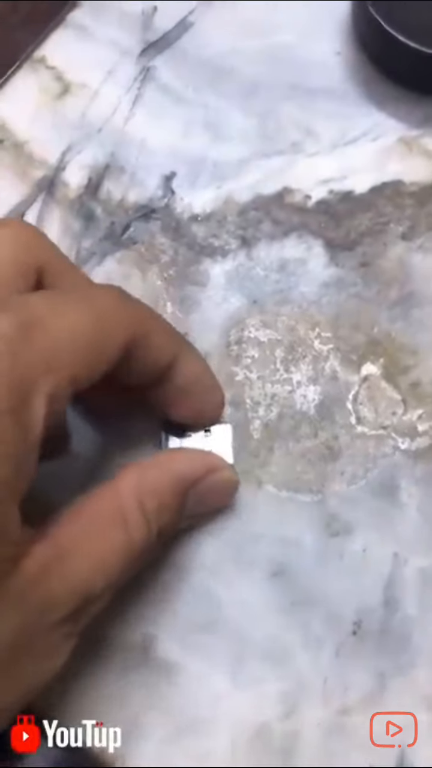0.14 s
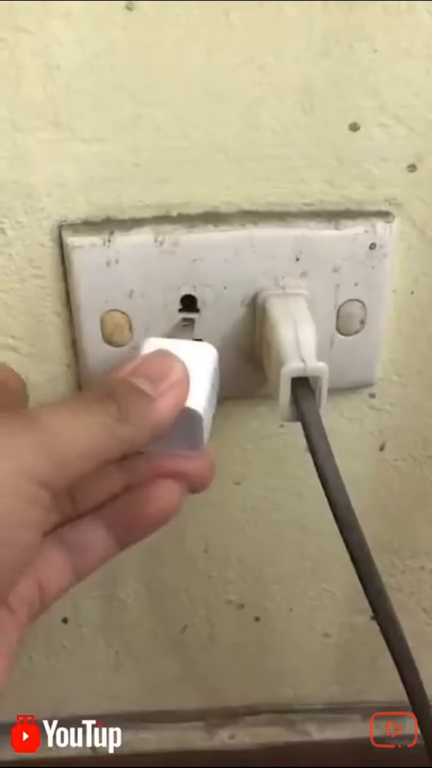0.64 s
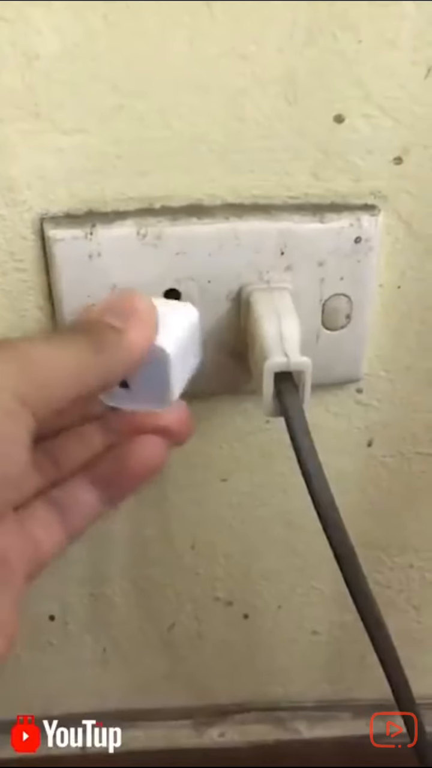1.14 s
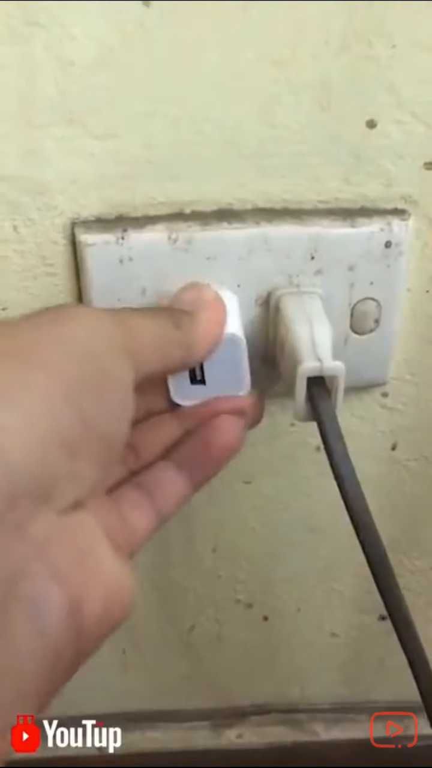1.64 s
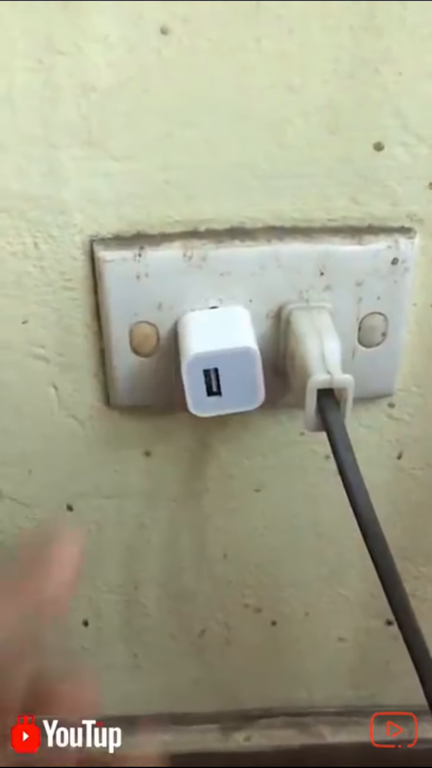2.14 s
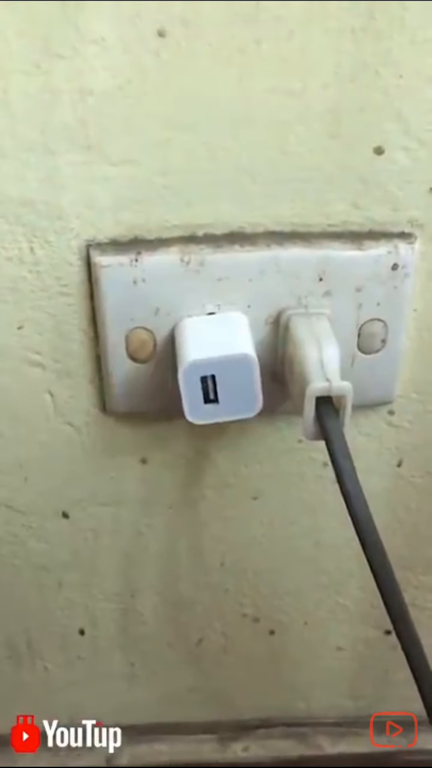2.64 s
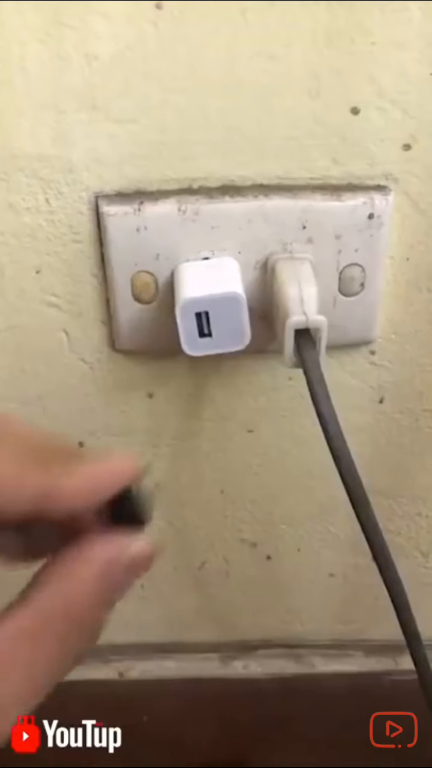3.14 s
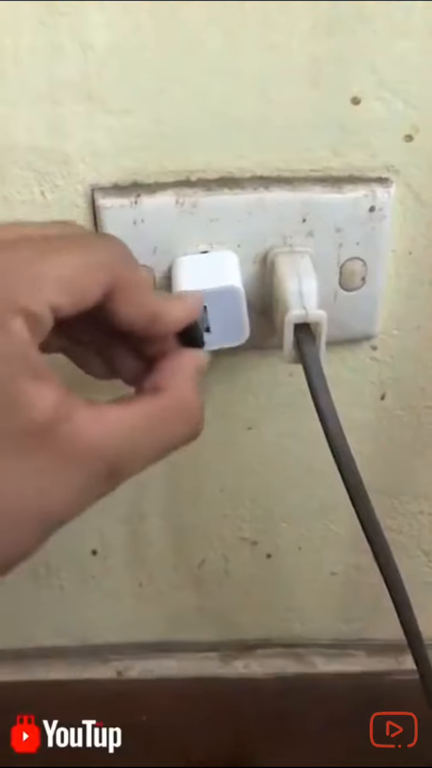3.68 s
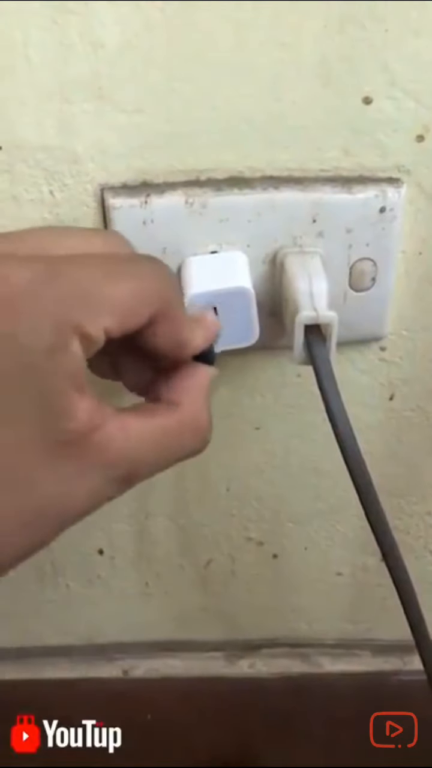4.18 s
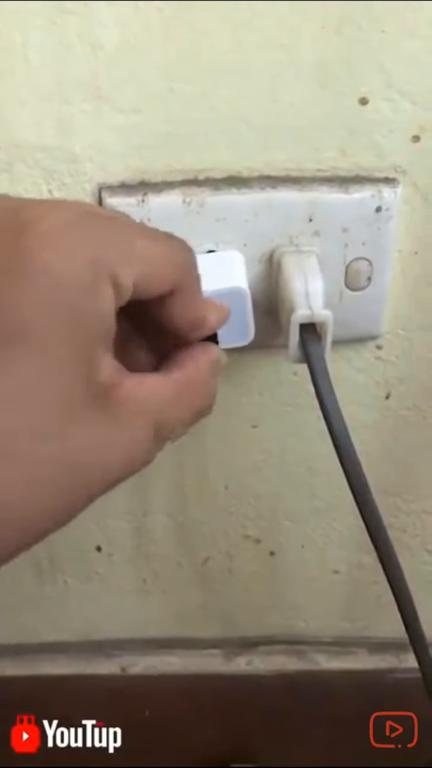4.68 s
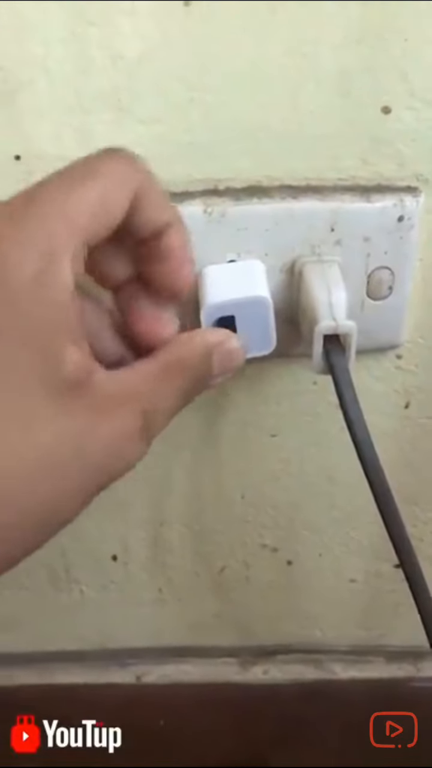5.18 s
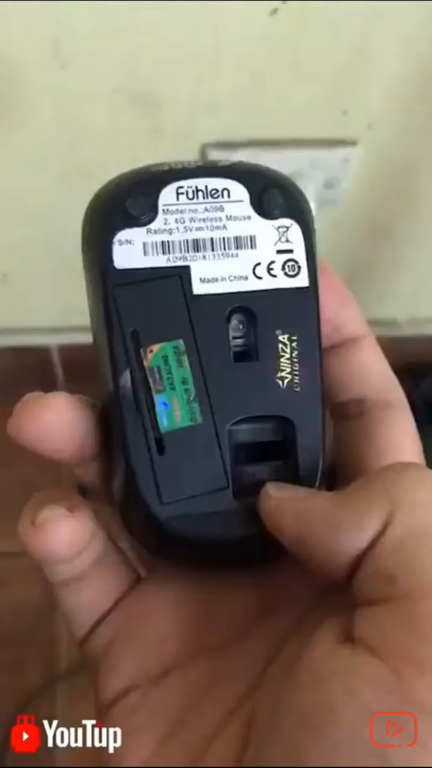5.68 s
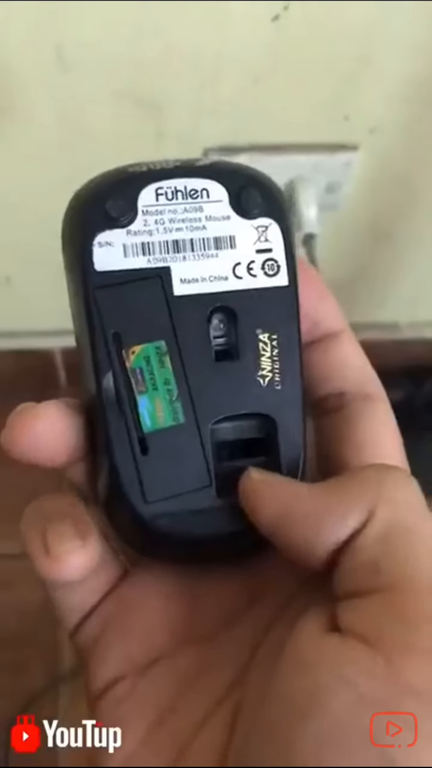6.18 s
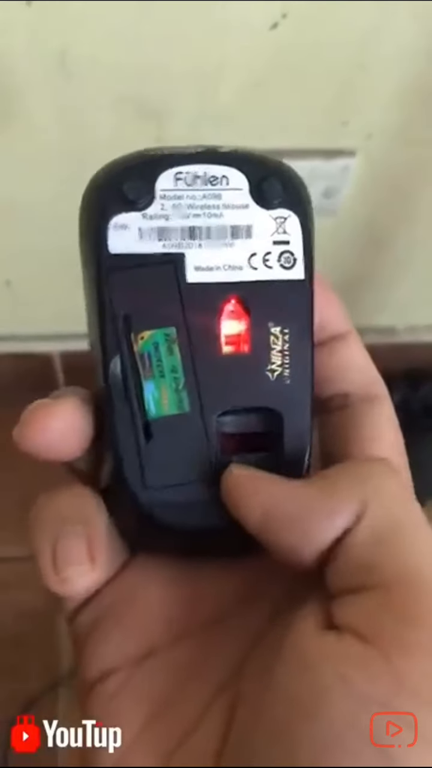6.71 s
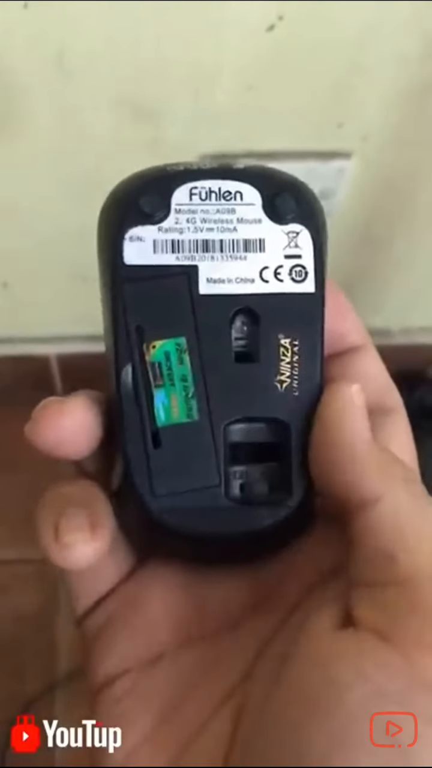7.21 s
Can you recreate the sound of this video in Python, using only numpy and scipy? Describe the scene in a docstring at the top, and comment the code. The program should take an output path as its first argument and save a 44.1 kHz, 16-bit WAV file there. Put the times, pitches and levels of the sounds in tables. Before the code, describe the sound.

Quiet indoor handling: faint skin scuffs, two loud bright plastic snaps at a socket, a dull distant knock, then small dry clicks over low hiss.

```python
"""Small plastic ticks ring briefly near the microphone: a hand lifts a tiny receiver off a stone table,
pushes an adapter into a wall socket, fits the receiver into it and works the switch under a mouse.
Ticks are bursts of tiny contacts sent through resonances; scuffs, far metal tinkles and one far knock
with its bounce are shaped noise, and a thin whistle is a sine.
A short room tail follows the hand and far sounds. Four parts each have their own hiss, over a faint hum."""
import sys
import numpy as np
from scipy import signal
from scipy.fft import rfft, irfft
from scipy.io import wavfile
from scipy.ndimage import uniform_filter1d

SR = 44100
rng = np.random.default_rng(int(sys.argv[2]) if len(sys.argv) > 2 else 0)


def int16_out(signal):
    """Quantize to a 16-bit WAV file."""
    q = np.round(np.clip(np.atleast_2d(signal).T, -1, 1) * 32767)
    wavfile.write(sys.argv[1], SR, q.astype(np.int16))


def rack_gain(trim_db):
    """Turn a fader trim in dB into the linear factor to multiply a signal by."""
    fader = np.asarray(trim_db, float)
    return 10 ** (fader / 20)


N = 323022  # length in samples


def read(points, hz):
    """Reads a table between its points, on a log-frequency axis."""
    f, value = np.transpose(points)
    return np.interp(np.log(hz + 1), np.log(f + 1), value)


def evened(x):
    """Scales to an rms (average strength) of 1."""
    return x / np.sqrt(np.mean(x ** 2) + 1e-20)


def add(mix, s, sound):
    """Mixes a sound in at time s, in seconds."""
    part = mix[round(s * SR):][:len(sound)]
    part += sound[:len(part)]


def noise(size, colour_db):
    """Noise of rms 1 whose spectrum in dB is the given function of Hz."""
    spectrum = rfft(rng.standard_normal(size))
    return evened(irfft(spectrum * rack_gain(colour_db(np.fft.rfftfreq(size, 1 / SR))), size))


def hiss():
    """Room noise that jumps in level and colour at the start of each part, with drifting patches."""
    # level curve of each of the four parts: start_s, level_db
    part_levels = [
        [(0, -60.5), (.432, -58)],
        [(.432, -47), (1.0, -47.5), (1.4, -49.5), (1.9, -52.5), (2.814, -53)],
        [(2.814, -60), (5.69, -60)],
        [(5.69, -60.5), (7.33, -62)],
    ]
    # colour of the air at the table, socket, wall and mouse: pitch_hz, level_db (per Hz, relative)
    table_air = [(25, -33), (50, -4.5), (1100, -2.5), (1500, -11), (2500, -7.5), (3800, 0), (5800, -15.5),
                 (9500, -22.5), (15800, -29)]
    socket_air = [(25, -55), (50, -9.5), (230, -4), (470, -8), (1030, 1), (1490, -11.5), (1750, -3),
                  (2170, -7), (2500, -7.5), (3150, 0.5), (3800, -3), (4700, -10), (5600, -17.5),
                  (6150, -21), (6900, -19.5), (8400, -22.5), (9600, -31), (15800, -31)]
    wall_air = [(25, -54), (50, -10.5), (214, -3), (500, -6.5), (740, 0.5), (1200, -6), (1530, -14),
                (2050, -13), (3640, -8.5), (5700, -23), (6800, -24.5), (9600, -30.5), (11500, -29),
                (15800, -29.5)]
    mouse_air = [(25, -50), (50, -1.5), (330, -3.5), (700, -2.5), (1180, -5), (1550, -10), (2330, -9.5),
                 (3540, -2.5), (5800, -18.5), (9600, -26), (15800, -25.5)]
    frame, hop = 1024, 256  # samples
    low_hz, high_hz = 333, 10700
    patch_db = 1.4
    out = np.zeros(N)
    hz = np.fft.rfftfreq(frame, 1 / SR)
    # only the middle band follows the level curve; rumble and top hiss stay put
    follows = 1 / (1 + (low_hz / (hz + 1)) ** 4) / (1 + (hz / high_hz) ** 4)
    for rows, air_colour in zip(part_levels, (table_air, socket_air, wall_air, mouse_air)):
        s, level_db = np.transpose(rows)
        size = len(np.arange(s[0], s[-1], 1 / SR))
        real, imaginary, patches = rng.standard_normal((size // hop + 5, len(hz), 3)).T
        patches = uniform_filter1d(patches, size=10, axis=0)  # smooth over pitch
        patches = evened(uniform_filter1d(patches, size=8, axis=1))  # and over time
        steady = (real + 1j * imaginary) * rack_gain(read(air_colour, hz)[:, None] + patch_db * patches)
        frame_s = s[0] + np.arange(steady.shape[1]) * hop / SR
        swing_db = np.interp(frame_s, s, level_db) - level_db[-1]
        moving = steady * rack_gain(follows[:, None] * swing_db)
        both = signal.istft(np.array([steady, moving]), nperseg=frame, noverlap=frame - hop)[1]
        still, air = both[:, :size]
        add(out, s[0], air / still.std() * rack_gain(level_db[-1]))
    return out


def hum():
    """Faint steady sine tones below the hiss."""
    # hum tones: pitch_hz, level_db (rms)
    hum_tones = [(50, -82.5), (100, -81.5), (237, -82)]
    t = np.arange(N) / SR
    return sum(rack_gain(db) * np.sqrt(2) * np.sin(2 * np.pi * hz * t) for hz, db in hum_tones)


def scuffs():
    """Skin and plastic sliding: short grainy swishes of band noise with a quick start and slower fade."""
    # slides: start_s, length_s (stretch of the swell; the fade runs on to twice this),
    # level_db (before the swell), pitch_hz (centre), width_octaves (to 12 dB down on either side)
    slides = [(0.104, 0.1, -49, 4030, 0.88), (0.109, 0.081, -65, 11800, 0.22),
              (0.351, 0.12, -49, 3960, 0.83), (1.935, 0.032, -59, 8200, .7),
              (2.63, 0.045, -62.5, 9050, 0.86), (2.638, 0.085, -48, 735, 1.16),
              (4.451, 0.026, -50.5, 4670, 0.43), (4.543, 0.026, -56.5, 5200, 1.05),
              (5.303, 0.031, -58, 11000, 3.2), (4.909, 0.026, -43, 4100, 0.55),
              (6.428, 0.026, -47, 4000, .7)]
    out = np.zeros(N)
    for s, length, db, hz, octaves in slides:
        u = np.arange(round(2.0 * length * SR)) / (length * SR)
        band = noise(len(u), lambda f: -12 * (np.log2((f + 1) / hz) / octaves) ** 2)
        grain_db = 2.0 * evened(uniform_filter1d(rng.standard_normal(len(u)), size=60))
        swell = 4.7 * u * np.exp(-3.2 * u)
        add(out, s, rack_gain(db) * evened(band * rack_gain(grain_db)) * swell)
    return out


def whistle():
    """A thin high sine of steady pitch that swells twice."""
    # loudness of the whistle: start_s, level_db (rms)
    swells = [(0.302, -67), (.335, -55), (.358, -61), (.383, -54), (.408, -63), (.438, -63)]
    pitch_hz = 5750
    s, db = np.transpose(swells)
    t = np.arange(s[0], s[-1], 1 / SR)
    tone = np.sqrt(2) * np.sin(2 * np.pi * pitch_hz * t)
    out = np.zeros(N)
    add(out, s[0], tone * rack_gain(np.interp(t, s, db)) * signal.windows.tukey(len(t), .1))  # soft ends
    return out


def ring(resonances, chatter_s, fade_s, chance, rise_s=.0001):
    """A first contact, a chatter of tiny ones and their dying rattle excite broad resonances; peak 1."""
    chatter_db, chatter_fade_db = -14.5, -6  # against the first contact; change while the chatter lasts
    t = np.arange(len(chance)) / SR
    after_s = np.maximum(t - chatter_s, 0)
    fall_db = chatter_fade_db * np.minimum(t / max(chatter_s, 1 / SR), 1) - 60 * after_s / fade_s
    rattle = chance * rack_gain(chatter_db + fall_db) * (1 - np.exp(-t / rise_s))
    rattle[round(rise_s * SR)] += 1  # the first contact
    lines = rfft(rattle)
    rattle = irfft(lines / abs(lines), len(t))  # colourless: all colour comes from the resonances
    rattle = rattle * rack_gain(-27 * after_s / fade_s)  # fades once more, since the step above spreads it in time
    sound = 0
    for hz, width, db in resonances:
        b, a = signal.iirpeak(hz, hz / width, SR)
        twice = signal.lfilter(b, a, signal.lfilter(b, a, rattle))
        sound = sound + rack_gain(db) * twice / width
    return sound / abs(sound).max()


def ticks():
    """Each contact rings a plastic shell at once; the low thud of what holds it swells more slowly."""
    # ticks: start_s, level_db (peak of the shell's ring), thud_db and edge_db (against that peak),
    # chatter_s, pitch_hz (favoured by the spot struck)
    contacts = [(.433, -32, -16, -23, 0.00091, 4060), (0.524, -37, -8, -17, 0.0035, 4140),
                (.592, -33, -28, -25, 0.0052, 4300), (1.0368, -19, -32, -26, .0005, 4560),
                (1.0381, -13.5, -30, -10, 0.0012, 5350), (1.0404, -11.5, -28, -12, 0.0013, 4060),
                (1.043, -13, -39, -24, 0.0013, 4400), (1.0706, -34, -22, -27, 0.001, 4400),
                (1.0729, -23, -16, -19, 0.0011, 3760), (1.433, -8.5, -25.5, -16, 0.0001, 4300),
                (1.4401, -11.5, -40, -8.5, 0.00036, 4500), (1.441, -14, -12.5, -11, 0.0074, 3950),
                (1.454, -23, -6.5, -14, 0.0047, 4160), (3.7496, -33.5, -10, -1.5, 0.0028, 5300),
                (3.925, -46.5, 0.5, -14, 0.0011, 3190), (4.178, -40, -14, -15, 0.0016, 5310),
                (4.445, -38, -5.5, -5, 0.0042, 3620), (4.478, -35.5, -17, -19, 0.0035, 3850),
                (4.572, -48.5, -1.5, -5, 0.0045, 4400), (4.9166, -28.5, -8, -10, 0.0033, 4820),
                (4.941, -36, -24, -22, .001, 4500), (5.134, -41, -11, 0, 0.0023, 4760),
                (5.1574, -40, -17, -22, 0.00034, 4800), (5.185, -31, -15, -15, 0.003, 3670),
                (6.287, -43, -13, -18, .0005, 3900), (6.3522, -33, -19, -6, 0.0012, 5900),
                (6.4097, -36.5, -17, -24, 0.00055, 3950), (6.438, -33.5, -8.5, -13.5, 0.0025, 3420),
                (6.4573, -46, 0.5, -22, 0.00038, 3320), (6.6982, -43.5, 2, -22, 0.0034, 3320)]
    # resonances: pitch_hz, width_hz (of one filter pass; two are made), level_db (relative weight)
    socket_shell = [(2200, 600, -11), (3240, 520, -0.5), (3690, 410, -1), (3950, 780, 9), (4400, 360, -2),
                    (4820, 410, -6.5), (5350, 270, -14.5)]  # adapter and socket
    mouse_shell = [(2250, 470, -5), (3320, 310, -1), (4100, 350, 6), (4960, 450, -1), (5900, 220, -16.5)]
    wall_plate = [(649, 260, -1), (1125, 370, 3), (2045, 390, 2.5)]
    palm = [(705, 350, 2), (1034, 250, 8.5), (1260, 75, -2), (1880, 530, 2)]  # hand round the mouse
    bright_edge = [(7170, 1100, -0.5), (8080, 1600, 1), (11050, 2300, -1)]
    mouse_from_s = 5.69
    shell_fade_s, edge_fade_s, thud_fade_s = 0.029, 0.04, 0.044  # rattle after the chatter
    thud_rise_s = 0.00047
    spread_db, detune = 1.5, .01  # random change of each resonance's level and (as a fraction) pitch
    lift_db, lift_octaves = 14, 0.032  # resonances near the favoured pitch ring louder
    close, for_room = out = np.zeros((2, N))  # the room takes up the ticks without the favoured pitch
    for s, db, thud_db, edge_db, chatter_s, spot_hz in contacts:
        shell, holder = (socket_shell, wall_plate) if s < mouse_from_s else (mouse_shell, palm)
        shell_chance, edge_chance, thud_chance = rng.standard_normal((3, 2500))
        struck = []
        for hz, width, weight_db in shell:
            shift, change = rng.standard_normal(2)
            nearness = np.exp(-(np.log2(hz / spot_hz) / lift_octaves) ** 2)
            struck_db = weight_db + spread_db * change + lift_db * nearness
            struck.append((hz * (1 + detune * shift), width, struck_db))
        extras = rack_gain(edge_db) * ring(bright_edge, chatter_s, edge_fade_s, edge_chance)
        extras += rack_gain(thud_db) * ring(holder, chatter_s, thud_fade_s, thud_chance, thud_rise_s)
        add(close, s, rack_gain(db) * (extras + ring(struck, chatter_s, shell_fade_s, shell_chance)))
        add(for_room, s, rack_gain(db) * (extras + ring(shell, chatter_s, shell_fade_s, shell_chance)))
    # contacts are too soft for the top treble
    return signal.sosfilt(signal.butter(4, 13200, fs=SR, output="sos"), out)


def tinkles():
    """Small far metal shivers: noise in two narrow bands over a bright hiss."""
    # tinkles: start_s, level_db (at the start), length_s (to 20 dB down)
    shivers = [(2.956, -57.5, 0.19), (3.667, -72, 0.11), (3.736, -65, 0.14), (5.106, -71, 0.089)]
    # narrow metal bands: pitch_hz, width_hz, level_db (relative)
    metal_bands = [(10380, 47, 6), (12000, 70, -4)]

    def shimmer_db(f):
        power = rack_gain(-34) / (1 + (f / 10000) ** 4)  # the bright hiss
        for hz, width, db in metal_bands:
            power = power + rack_gain(2 * db) / (1 + (2 * (f - hz) / width) ** 2)
        return 10 * np.log10(power)

    out = np.zeros(N)
    for s, db, length in shivers:
        u = np.arange(round(1.1 * length * SR)) / (length * SR)
        add(out, s, rack_gain(db - 20 * u ** 2) * np.minimum(u * 200, 1) * noise(len(u), shimmer_db))
    return out


def knocks():
    """A dull far knock and its bounce: dying noise with a hollow tone that lingers."""
    # knock and bounce: start_s, level_db (of the blow, before its soft rise)
    blows = [(2.990, -37), (3.008, -40.5)]
    # colour of the blow: pitch_hz, level_db (per Hz, relative)
    blow_colour = [(250, -36), (450, 0.5), (660, 1), (1250, 0), (2000, -15), (4000, -13.5), (15000, -51)]
    # hollow tone: pitch_hz, width_hz (to 6 dB down on either side), level_db (against the blow), fade_s (60 dB)
    hollow_hz, width_hz, hollow_db, hollow_fade_s = (742, 115, -18, 1.1)
    rise_s, blow_fade_s = .004, 0.12  # the fade is by 60 dB
    out = np.zeros(N)
    t = np.arange(SR // 2) / SR
    for s, db in blows:
        blow = rack_gain(-60 * t / blow_fade_s) * noise(len(t), lambda f: read(blow_colour, f))
        hollow = noise(len(t), lambda f: -20 * np.log10(1 + ((f - hollow_hz) / width_hz) ** 2))
        hollow = rack_gain(hollow_db - 60 * t / hollow_fade_s) * hollow
        add(out, s, rack_gain(db) * (1 - np.exp(-t / rise_s)) * (blow + hollow))
    return out


def room(x):
    """The room's tail: sparse echoes of random sign, each band dying at its own speed."""
    # dying of the echoes: pitch_hz, fade_s (by 60 dB)
    echo_fades = [(500, 0.3), (1500, 1), (3800, 0.68), (8000, 0.57), (12000, 0.36)]
    taps = np.zeros(SR)
    at = np.arange(200, SR - 20, 20)  # samples
    taps[at + rng.integers(0, 20, len(at))] = rng.choice([-1., 1.], len(at))
    hz, t, z = signal.stft(taps, SR, nperseg=256)
    tail = signal.istft(z * rack_gain(-60 * t / read(echo_fades, hz)[:, None]), SR, nperseg=256)[1]
    return signal.fftconvolve(x, tail / np.linalg.norm(tail))[:N]


def scene():
    """Hand sounds and far sounds with their room tail, and the whistle, over hiss and hum."""
    room_db = -16
    close_ticks, room_ticks = ticks()
    others = scuffs() + tinkles() + knocks()
    tail = rack_gain(room_db) * room(room_ticks + others)
    return (close_ticks + others + tail + whistle() + hiss() + hum())[None]


def low_pass(x):
    """Removes everything above the highest recorded frequency."""
    return signal.sosfilt(signal.butter(12, 16110, fs=SR, output="sos"), x)


def record(dry):
    """Low tones lag behind high ones, so every click droops in pitch; the top treble is cut off."""
    lag_at_1k_s, top_khz = 0.003725, 15.9
    khz = np.fft.rfftfreq(N, 1000 / SR)
    lag_s = lag_at_1k_s / np.maximum(khz, .4) ** 1.597  # no longer grows below 0.4 kHz
    turn = np.exp(-2j * np.pi * np.cumsum(lag_s) * SR / N)  # phase turn that gives each pitch its lag
    drooped = irfft(rfft(dry, N) * (khz < top_khz) * turn, N)[:, :N]
    return low_pass(drooped)


dry = scene()
out = record(dry)
int16_out(out)
```